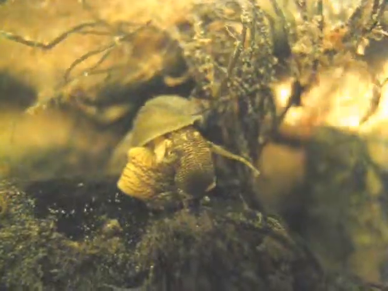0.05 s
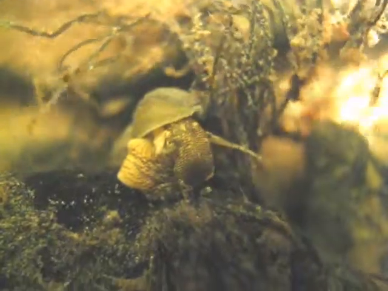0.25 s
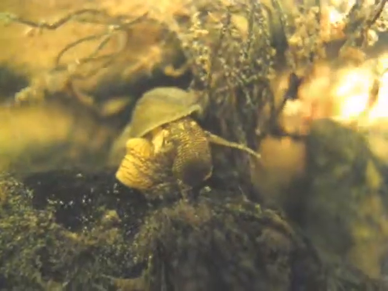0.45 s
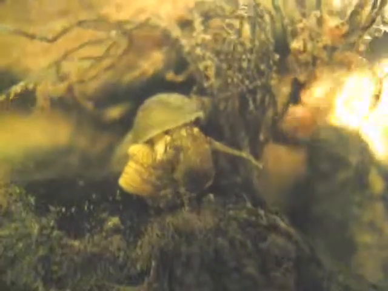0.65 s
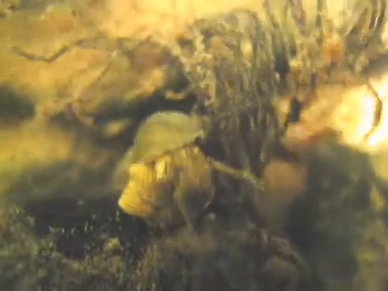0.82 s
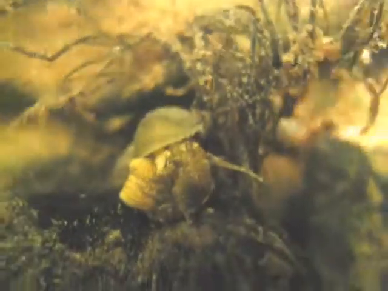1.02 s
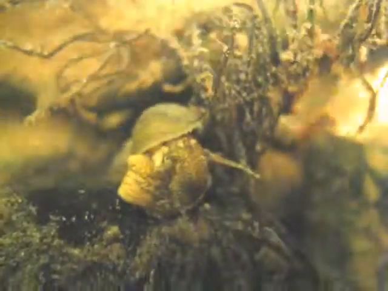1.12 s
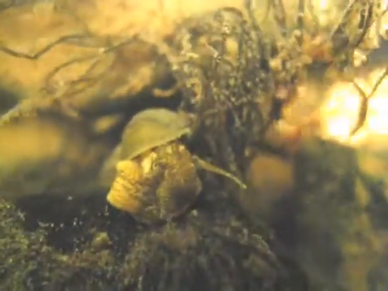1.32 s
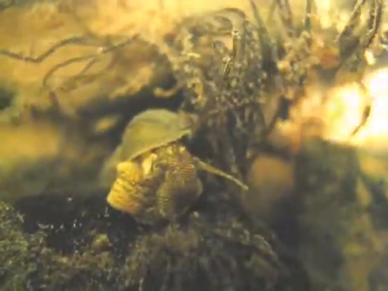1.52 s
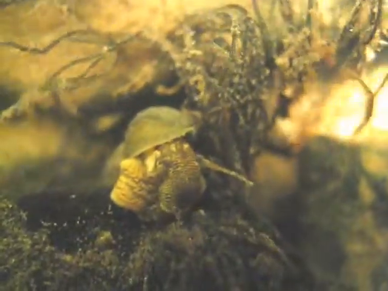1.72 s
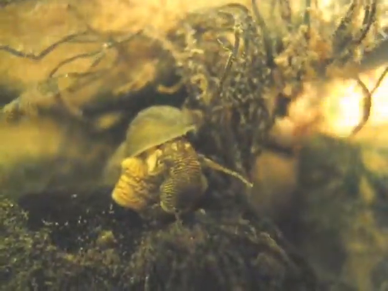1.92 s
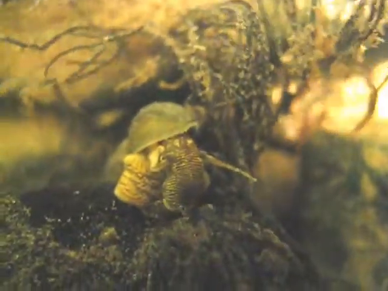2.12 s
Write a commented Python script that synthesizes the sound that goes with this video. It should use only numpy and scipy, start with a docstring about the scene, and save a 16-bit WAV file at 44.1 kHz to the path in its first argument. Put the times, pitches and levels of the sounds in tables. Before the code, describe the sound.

Knocks and hard clicks of a small camera housing bumping stream-bed stones, one very loud crack early, a brief metallic tink, then a gritty cluster fading to faint water; heard from inside the housing, low-fidelity.

```python
"""Dull knocks and hard clicks: a small camera in a waterproof housing is shifted against stones on a stream bed.
Knocks are short forced pulses with a housing ring; clicks are noisy cracks with damped wall modes.
One contact rings like thin metal, with modes of wandering phase; grit gives a stuttering scrape and snaps.
Shaped noise murmurs faintly behind as water. The recorder holds samples at a low rate, so mirror
images of the spectrum add a gritty treble."""
import sys
import numpy as np
from scipy import signal
from scipy.fft import rfft, irfft, next_fast_len
from scipy.io import wavfile
from scipy.ndimage import uniform_filter1d

SR = 44100
rng = np.random.default_rng(int(sys.argv[2]) if len(sys.argv) > 2 else 0)


def to_wav(s):
    """Save 16-bit WAV."""
    ch = np.atleast_2d(s).T  # columns
    pcm = np.round(np.clip(ch, -1, 1) * 32767)  # PCM
    wavfile.write(sys.argv[1], SR, pcm.astype(np.int16))


N = 94815  # length in samples

# noise spectrum of grit slipping and snapping: f/Hz, level/dB
GRIT_SPECTRUM = [(200, -10), (1400, -5), (1800, -8), (2080, 5), (2300, -9), (2520, 2), (3000, 3),
                 (4000, -7.5)]
# noise spectrum of a hard contact: f/Hz, level/dB
CRACK_SPECTRUM = [(40, -36), (200, 5.5), (600, -7), (1200, -7.5), (1600, -14), (2200, 1.5), (3000, 0.5),
                  (4000, -4.5)]


def amp(db):
    """Level to amplitude ratio: 20 dB is a factor of ten."""
    return 10 ** (np.asarray(db) / 20)


def unit(x):
    """Normalization of the mean power: the rms becomes 1."""
    return x / np.sqrt(np.mean(x ** 2) + 1e-20)


def filtered(x, response):
    """Linear filtering: the spectrum is multiplied by a response of frequency."""
    size = next_fast_len(len(x) + 8192)  # zero padding gives the filter tail room
    spectrum = rfft(x, size) * response(np.fft.rfftfreq(size, 1 / SR))
    return irfft(spectrum, size)[:len(x)]


def coloured(x, spectrum):
    """Spectral shaping: levels are interpolated over log frequency, and the result has rms 1."""
    f, db = np.transpose(spectrum)
    return unit(filtered(x, lambda hz: amp(np.interp(np.log(hz + 1), np.log(f), db))))


def decay(t, t60):
    """Exponential damping: the level falls by 60 dB in t60 seconds."""
    return np.exp(-np.log(1000) * t / t60)


def ring(modes, t):
    """Modal superposition: a struck body sounds as a sum of damped sinusoids."""
    return sum(amp(db) * decay(t, t60) * np.sin(2 * np.pi * hz * t) for hz, db, t60 in modes)


def burst(t, t60, spectrum):
    """Damped broadband noise: its energy is fixed by its decay alone."""
    fade = decay(t, t60)
    noise = fade * coloured(rng.standard_normal(len(t)), spectrum)
    return unit(noise) * np.sqrt(np.mean(fade ** 2))


def add(track, s, sound):
    """Superposition: a sound is summed into the track from time s in seconds."""
    part = track[max(round(s * SR), 0):][:len(sound)]
    part += sound[:len(part)]


def level_curve(points):
    """Time-varying gain: levels are interpolated linearly in dB between (t/s, level/dB) points."""
    return amp(np.interp(np.arange(N) / SR, *np.transpose(points)))


def water():
    """Turbulent flow noise: a random murmur with patchy levels over time and frequency, heard through the housing."""
    # strength of the murmur: t/s, level/dB
    flow_level = [(0, -48.5), (1.2, -49.5), (1.45, -49), (1.7, -49), (1.8, -49.5), (2.15, -49)]
    # spectrum of the murmur: f/Hz, level/dB
    water_spectrum = [(20, -40), (50, -11), (97, -2), (250, 0), (450, 0.5), (570, 7.5), (700, -2.5),
                      (860, 1.5), (1450, -5), (1720, 0), (2450, -8), (3040, -7), (4000, -17)]
    patch_db, swell_db = 1.5, 0.5  # rms level fluctuation, dB
    z = signal.stft(rng.standard_normal(N), nperseg=1024)[2]
    # patches vary over frequency and time, the swell over time alone
    patches = uniform_filter1d(rng.standard_normal(z.shape), size=5, axis=0)
    patches = uniform_filter1d(patches, size=6, axis=1)
    swell = uniform_filter1d(rng.standard_normal(z.shape[1]), size=20)
    gain = amp(patch_db * unit(patches) + swell_db * unit(swell))
    flow = signal.istft(z * gain)[1][:N]
    return level_curve(flow_level) * coloured(flow, water_spectrum)


def rub():
    """Stick-slip friction: dense random tiny slips over grit follow the pressure on the housing."""
    # strength of the rubbing: t/s, level/dB
    rub_level = [(0, -68), (.64, -63), (.70, -48), (.74, -52), (.765, -57), (.80, -46.5), (.87, -62),
                 (.925, -45), (.955, -64), (1.035, -42), (1.08, -46.5), (1.098, -46), (1.135, -39.5),
                 (1.155, -49.5), (1.19, -49.5), (1.24, -58), (1.51, -57), (1.585, -50.5), (1.63, -54),
                 (1.69, -55), (1.77, -74), (2.15, -75)]
    slips_per_s = 5000  # mean rate
    slips = (rng.random(N) < slips_per_s / SR) * rng.standard_normal(N)
    return level_curve(rub_level) * coloured(slips, GRIT_SPECTRUM)


def ticks():
    """Impulsive fracture: single grains of grit snap under the housing as noise bursts without ringing."""
    # snapping grains: t/s, level/dB
    snaps = [(0.312, -56), (.338, -52), (.7155, -36), (.7322, -33), (1.0872, -38), (1.1755, -35.5),
             (1.191, -41), (1.272, -43)]
    attack_s, t60_s = 0.00032, 0.022  # rise time constant and decay time, s
    out, t = np.zeros(N), np.arange(SR // 16) / SR
    for s, db in snaps:
        rise = 1 - np.exp(-t / attack_s)
        add(out, s, amp(db) * rise * burst(t, t60_s, GRIT_SPECTRUM))
    return out


def tink():
    """Phase diffusion: a small metal part, struck once, rings unsteadily and chatters against the stone."""
    # modes of the metal part: f/Hz, level/dB, t60/s
    metal_modes = [(1366, -1, 0.16), (2281, 3.5, 0.095), (2440, 1, 0.11), (3360, -13, 0.15)]
    strike_s, strike_db = 0.516, -24.5
    rattle_db, rattle_t60_s = -2, 0.11
    width_hz = 2.6  # line width of each mode, from its random phase wander
    out, t = np.zeros(N), np.arange(SR // 4) / SR
    # a random walk of the phase broadens a spectral line
    steps = rng.standard_normal((len(metal_modes), len(t)))
    drift = np.cumsum(steps, axis=1) * np.sqrt(2 * np.pi * width_hz / SR)
    modes = np.zeros(len(t))
    for (hz, db, t60), phase in zip(metal_modes, drift):
        modes += amp(db) * decay(t, t60) * np.sin(2 * np.pi * hz * t + phase)
    rattle = amp(rattle_db) * burst(t, rattle_t60_s, CRACK_SPECTRUM)
    add(out, strike_s, amp(strike_db) * (modes + rattle))
    return out


def clicks():
    """Impact excitation: hard contact with stone gives a noisy crack, a brief ring and the modes of the wall."""
    # contacts: t/s, level/dB, ring f/Hz, ring t60/s, crack level relative to the ring/dB
    contacts = [(0.237, -43, 1760, 0.023, 7.5), (0.386, -25.5, 2000, 0.0047, 5),
                (0.3882, 8.5, 1925, 0.0082, -29), (0.3898, -15, 2380, 0.0079, -1.5),
                (.4248, -19.5, 2246, 0.015, -2.5), (.427, -15.5, 1320, 0.012, -20),
                (0.515, -18.5, 3017, 0.042, 9), (0.5226, -12.5, 2267, 0.019, -10),
                (0.6332, -25.5, 2500, 0.0096, 15), (.6378, -17, 2206, 0.033, -15),
                (.6393, -5, 2880, 0.0095, -7), (0.6398, -21.5, 3400, 0.016, 9),
                (.839, -17.5, 1933, .013, -1), (0.8849, -33, 2160, 0.015, 5), (.9175, -35, 2020, .015, -4),
                (0.933, -29, 1970, 0.047, 1.5), (0.9381, -20, 2740, 0.013, -2),
                (0.9753, -27.5, 2060, 0.017, 5.5), (0.9936, -18, 2035, 0.016, 1),
                (1.0224, -22, 2050, .012, 2), (1.027, -24, 1990, 0.029, -5.5),
                (1.0425, -25, 1994, 0.031, -12), (1.048, -17, 1970, 0.019, -7),
                (1.0517, -13, 1980, 0.017, -13), (1.057, -16, 2007, 0.021, -15),
                (1.0669, -11.5, 1906, 0.015, -18.5), (1.0722, -27, 1214, 0.04, -2),
                (1.1327, -21, 2280, 0.025, -6), (1.1357, -21, 1052, 0.024, -5.5),
                (1.255, -46, 2080, .02, 11)]
    # wall modes under every click: f/Hz, level/dB, t60/s
    wall_modes = [(367, -31, 0.043), (1123, -19, 0.019), (1288, -24.5, .04), (2137, -18, 0.02),
                  (2604, -17.5, 0.018)]
    attack_s, crack_t60_s = 0.00073, 0.015  # rise time constant and decay time, s
    out, t = np.zeros(N), np.arange(SR // 8) / SR
    for s, db, hz, t60, crack_db in contacts:
        tone = ring([(hz, 0, t60)], t) + ring(wall_modes, t)
        crack = amp(crack_db) * burst(t, crack_t60_s, CRACK_SPECTRUM)
        rise = 1 - np.exp(-t / attack_s)
        add(out, s, amp(db) * rise * (tone + crack))
    return out


def knocks():
    """Forced then free vibration: a bump drives sagging low cycles while it lasts, and the housing rings on."""
    # bumps: t/s, level/dB, mid-contact f/Hz, contact length/s,
    # contact noise and housing ring levels relative to the push/dB
    bumps = [(0.2058, -13, 440, 0.0097, -16.5, 2), (.2435, -23, 389, .008, -25.5, -3.5),
             (0.3896, -40.5, 364, 0.0056, 3.5, 0), (0.4173, -24.5, 354, 0.0067, -12.5, -4),
             (0.4249, -19.5, 374, 0.0081, -8, 3), (.501, -13.5, 447, 0.0091, -8, -11),
             (0.5161, -35.5, 382, 0.011, 11.5, -14), (.6333, -19, 406, .012, -10.5, 1.5),
             (.830, -27.5, 510, 0.0054, -12.5, -4.5), (0.8398, -23, 440, .006, -3, -8),
             (0.901, -37, 430, 0.0079, -5, -11), (0.997, -16, 398, 0.0044, -49, -3),
             (1.0638, -27.5, 379, 0.0127, -3, -18), (1.133, -26.5, 499, .011, -0.5, -23)]
    # modes of the housing: f/Hz, level/dB, t60/s
    housing_modes = [(132, -28, 0.01), (344.5, -9.5, 0.097), (753, -10, 0.017), (950, -30, .018),
                     (1267, -20.5, 0.02)]
    # spectrum of the contact noise: f/Hz, level/dB
    thud_spectrum = [(30, -37), (110, -2), (400, -4.5), (1300, -5.5), (2500, -22), (4000, -28)]
    attack_s, release_s, thud_t60_s = 0.0019, 0.0031, 0.042  # rise and release constants, decay time, s
    sag = 0.087  # the pitch starts this share above its mid value and ends this share below
    out, t = np.zeros(N), np.arange(SR // 5) / SR
    for s, db, hz, length, thud_db, ring_db in bumps:
        pitch = hz * (1 + sag * (1 - 2 * np.minimum(t / length, 1)))
        rise = 1 - np.exp(-t / attack_s)
        release = (1 - np.tanh((t - length) / release_s)) / 2
        push = rise * release * np.sin(2 * np.pi * np.cumsum(pitch) / SR)
        thud = amp(thud_db) * burst(t, thud_t60_s, thud_spectrum)
        body = amp(ring_db) * ring(housing_modes, t)
        add(out, s, amp(db) * (push + body + thud))
    return out


def scene():
    """Linear superposition: all sources reach one microphone inside the housing."""
    return (water() + rub() + ticks() + tink() + clicks() + knocks())[None]


def record(dry):
    """Sample-and-hold imaging: a narrow band is held in steps, gains hiss, is clipped, then low-passed."""
    low_cut_hz, band_hz = 42, 4000  # edges of the band ahead of the hold
    hold_hz, top_hz = 8018, 16000  # sampling rate of the hold, final cutoff
    hiss_db = -69.5  # faint steady white hiss over the whole sound

    def band(hz):
        """Cascaded filters: two first-order high-passes and a steep low-pass."""
        high_pass = (1j * hz / (low_cut_hz + 1j * hz)) ** 2
        return high_pass / np.sqrt(1 + (hz / band_hz) ** 32)

    narrow = filtered(dry[0], band)
    step = SR / hold_hz
    held_at = np.floor(np.arange(N) / step) * step  # sample position last taken
    held = np.interp(held_at, np.arange(N), narrow)
    noisy = held + amp(hiss_db) * rng.standard_normal(N)
    return filtered(np.clip(noisy, -1, 1), lambda hz: hz < top_hz)[None]


dry = scene()
out = record(dry)
to_wav(out)
```